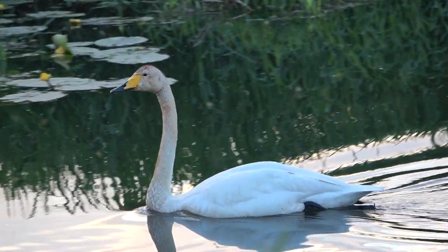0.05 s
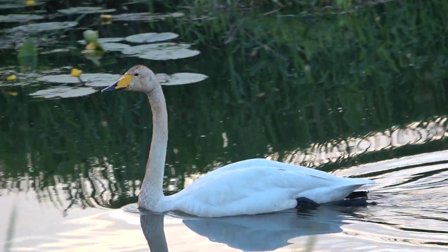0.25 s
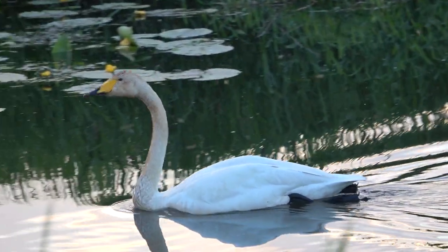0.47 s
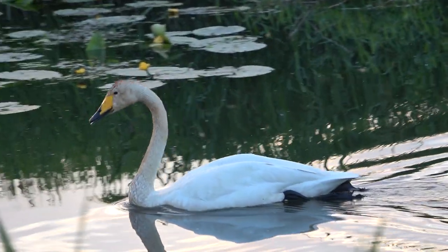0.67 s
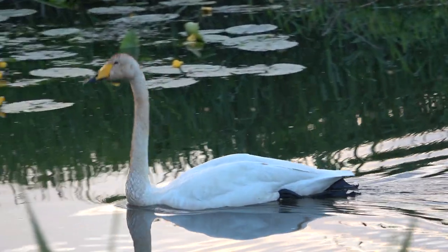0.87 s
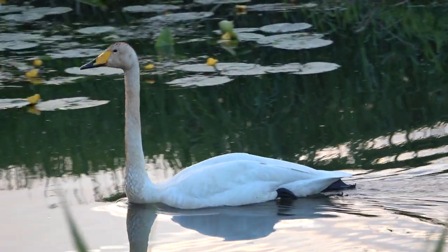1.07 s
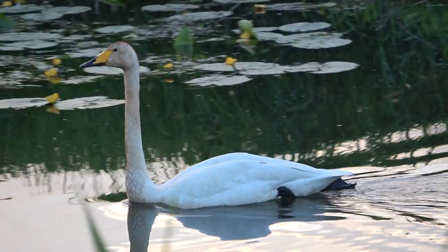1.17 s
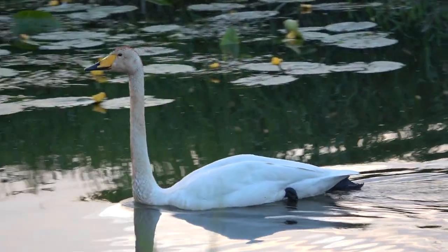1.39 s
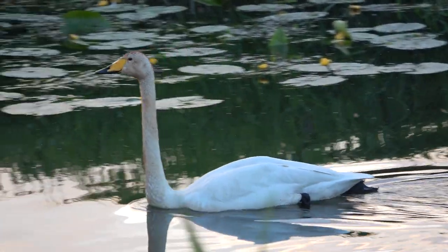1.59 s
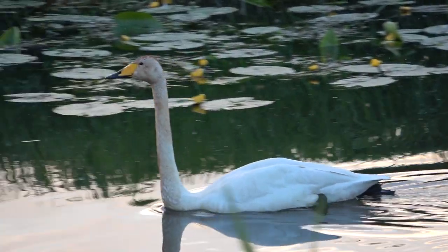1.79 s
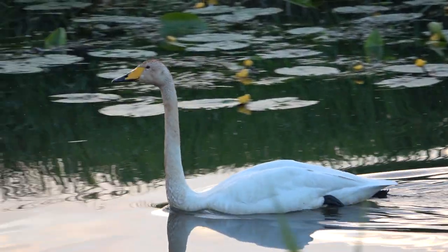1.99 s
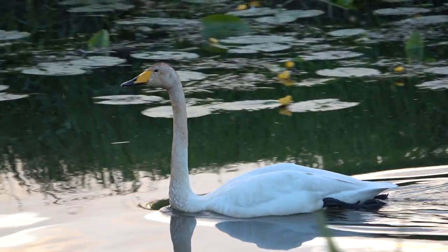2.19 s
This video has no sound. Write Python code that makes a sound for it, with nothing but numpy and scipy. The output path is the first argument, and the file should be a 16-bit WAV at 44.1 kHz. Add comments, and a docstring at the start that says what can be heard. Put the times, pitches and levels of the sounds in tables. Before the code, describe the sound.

A swan honks softly three times on a pond while small birds chirp and chatter nearby.

```python
"""A swan honks softly three times on a pond: stacks of overtones that brighten with effort.
Small birds sing in the reeds: a songbird's phrase and another bird's faint warble on the right, low piping,
chips, cheeps and faint far birds are bending whistles; a chatterer is a buzzy voice with a moving beak
resonance, one overtone doubled by a rising glide. Random taps scatter the calls. Shaped noise makes
the low rumble, a far drone (perhaps frogs), air hiss and dry rustling."""
import sys
import numpy as np
from scipy import signal
from scipy.fft import rfft, irfft
from scipy.io import wavfile
from scipy.ndimage import uniform_filter1d

SR = 44100
rng = np.random.default_rng(int(sys.argv[2]) if len(sys.argv) > 2 else 0)


def makeup_ratio(level_db):
    """Linear amplitude ratio for a level in decibels (20 dB per factor of ten)."""
    decades = np.asarray(level_db, float) / 20
    return 10 ** decades


def transcribe(signal):
    """Save signal, clipped to [-1, 1], as a 16-bit WAV file at the path in sys.argv[1]."""
    frames = np.atleast_2d(signal).T
    limited = np.clip(frames, -1, 1)
    pcm = np.round(limited * 32767).astype(np.int16)
    wavfile.write(sys.argv[1], SR, pcm)


N = 99225  # length in samples


def evened(x):
    """Scales a sound to an rms of 1."""
    return x / np.sqrt(np.mean(x ** 2) + 1e-20)


def read_curve(points, hz):
    """Reads a curve between its points, on a logarithmic pitch scale."""
    point_hz, value = np.transpose(points)
    return np.interp(np.log(hz + 1), np.log(point_hz + 1), value)


def add(mix, start_s, sound):
    """Adds a sound to the mix at its start time."""
    part = mix[max(round(start_s * SR), 0):][:len(sound)]
    part += sound[:len(part)]


def soft_edges(t, edge_s):
    """Fades a sound in and out so that it does not click."""
    from_edge = np.minimum(t - t[0], t[-1] - t)
    return np.sin(np.pi / 2 * np.clip(from_edge / edge_s, 0, 1)) ** 2


def wobble(n, window_s):
    """Random drift of rms about 1: noise averaged twice, slower for a longer window."""
    w = int(window_s * SR)
    noise = rng.standard_normal(N // 8)
    return uniform_filter1d(uniform_filter1d(noise, w), w)[:n] * np.sqrt(1.5 * w)


def place(x, lean_db):
    """Makes the left louder than the right by lean_db; below zero leans right."""
    return x * makeup_ratio([[lean_db / 2], [-lean_db / 2]])


def swan():
    """A long windpipe sounds many overtones at once; they grow faster than the pitch tone with effort."""
    # Three honks, each a path. Each row: time in seconds, level of the voice in dB, pitch in Hz.
    honks = [
        [(.776, -52.5, 579), (.795, -36.5, 603), (.812, -37.5, 549.7), (.842, -35.5, 549.4), (.851, -36, 595),
         (.866, -49, 714)],
        [(1.1, -50, 513), (1.113, -44, 554), (1.122, -44, 562), (1.138, -52.5, 568)],
        [(1.352, -52.5, 498), (1.367, -41, 534.6), (1.394, -45, 518), (1.405, -36, 542.4), (1.415, -38, 553),
         (1.421, -38.5, 600), (1.43, -94, 570)],
    ]
    # Overtones of the windpipe; half multiples come from strong-weak pulses.
    # Each row: multiple of the pitch, basic level in dB.
    windpipe = [(1, 0.5), (1.5, -22.5), (2, -14.5), (5, -10), (6, -16.5), (12, -35)]
    # One number per honk: basic change of its overtones in dB.
    honk_brass_db = [0, -16, -14]
    bright_at_db, brighten = -38, 1.3  # overtones gain 1.3 dB more per dB of level, around this level
    opens_s, grit_db = .038, 1.8  # overtones fade in over this time, and flicker this much

    out = np.zeros(N)
    for rows, brass_db in zip(honks, honk_brass_db):
        s, db, hz = np.transpose(rows)
        t = np.arange(s[0], s[-1], 1 / SR)
        level_db = np.interp(t, s, db)
        smooth_hz = uniform_filter1d(np.interp(t, s, hz), 100)
        turns = np.cumsum(smooth_hz * (1 + .003 * wobble(len(t), .003))) / SR
        effort_db = np.minimum(brighten * (level_db - bright_at_db), 3)
        opening_db = 20 * np.minimum((t - s[0]) / opens_s - 1, 0)
        overtone_db = brass_db + effort_db + opening_db
        tone = np.zeros(len(t))
        for multiple, basic_db in windpipe:
            extra_db = overtone_db + grit_db * wobble(len(t), 0.0016)
            extra_db = extra_db * min(multiple - 1, 1)  # none for the pitch tone, half at 1.5
            tone += makeup_ratio(basic_db + extra_db) * np.sin(2 * np.pi * multiple * turns)
        add(out, s[0], np.sqrt(2) * makeup_ratio(level_db) * soft_edges(t, 0.00098) * tone)
    return place(out, 1.36)


def whistler(notes, octave_db=-34, swell_db=-12, bend=2.3, top_at=.62):
    """Near-sine notes with an octave: each bends to its top pitch and away, swelling towards the top."""
    edge_s = .004  # also the window of the unsteadiness
    out = np.zeros(N)
    for start, length, db, first_hz, top_hz, last_hz in notes:
        t = np.arange(0, length, 1 / SR)
        u = t / length
        rising = u < top_at
        away = np.where(rising, 1 - u / top_at, (u - top_at) / (1 - top_at))  # 0 at the top, 1 at the ends
        hz = top_hz + (np.where(rising, first_hz, last_hz) - top_hz) * away ** bend
        angle = 2 * np.pi * np.cumsum(hz * (1 + .004 * wobble(len(t), edge_s))) / SR
        # Creeps in and stops short: the start is twice as many dB down as the end.
        level_db = db + swell_db * away ** 2 * np.where(rising, 2, 1)
        flutter_db = 3 * np.clip((-44 - db) / 10, 0, 1)  # faint notes flutter most
        level_db += flutter_db * wobble(len(t), edge_s)
        tone = np.sin(angle) + makeup_ratio(octave_db) * np.sin(2 * angle)
        add(out, start, np.sqrt(2) * makeup_ratio(level_db) * soft_edges(t, edge_s) * tone)
    return out


def right_whistles():
    """Whistled notes on the right: a phrase, its repeat, a faint high warble of another bird, and chips."""
    # The phrase, its repeat and the warble. Each row: start in seconds, length in seconds,
    # level at the top in dB, then first, top and last pitch in Hz.
    whistled = [(.31, 0.047, -42, 2600, 3230, 2480), (.322, 0.031, -53.5, 4000, 3770, 3680),
                (.399, 0.045, -34, 4135, 4263, 3600), (.42, 0.029, -54.5, 3100, 3380, 3300),
                (.452, 0.19, -62.5, 3900, 4560, 4220), (.598, 0.032, -53.5, 3690, 4210, 4150),
                (.638, 0.032, -51.5, 4560, 4380, 4370), (.641, 0.039, -44, 2480, 3344, 2280),
                (.72, 0.026, -50.5, 2990, 3570, 3500), (.872, 0.042, -58, 4170, 4820, 4660),
                (1.775, 0.027, -57.5, 3670, 3840, 3580), (1.838, 0.047, -42, 2590, 3163, 2600),
                (1.925, 0.051, -43, 3906, 4225, 3450), (1.955, 0.044, -50, 4200, 4350, 4100),
                (2.108, 0.028, -53.5, 3860, 4300, 4400)]
    # Pointed notes and quick chips. Each row: start in seconds, length in seconds, level at the top in dB,
    # then first, top and last pitch in Hz.
    chips = [(.203, .059, -43.5, 3330, 3740, 3210), (.382, 0.025, -54, 2110, 2880, 2050),
             (.408, 0.027, -61, 2470, 2880, 2300), (.935, 0.014, -48, 4180, 5000, 2900),
             (1.081, 0.029, -60, 2590, 3450, 3850), (1.515, 0.035, -55.5, 3050, 3600, 4130),
             (1.735, 0.051, -43.5, 3354, 3620, 3190), (2.086, 0.045, -60, 3050, 3600, 3580),
             (.993, 0.027, -53.5, 2800, 3480, 2680), (1.033, 0.029, -49, 2350, 3560, 2220),
             (1.909, 0.019, -52.5, 2050, 2810, 2200), (2.147, 0.016, -51, 2220, 3000, 3200),
             (2.162, 0.029, -54.5, 3160, 3480, 2500)]
    whistles = whistler(whistled, top_at=.8, bend=2.5, swell_db=-7)
    return place(whistles + whistler(chips, swell_db=-9, bend=1.5, top_at=.55), -6)


def low_whistles():
    """Low piped notes, and one rising glide that doubles an overtone of the chatterer."""
    # Near the middle: piped notes and the glide. Each row: start in seconds, length in seconds,
    # level at the top in dB, then first, top and last pitch in Hz.
    middle = [(.13, 0.059, -59.5, 1970, 2197, 1920), (.452, 0.066, -63.5, 2196, 2265, 2240),
              (.596, 0.045, -51, 2380, 2360, 2170), (1.085, 0.045, -60.5, 2174, 2600, 2900),
              (1.62, 0.11, -62.5, 2057, 2150, 1950), (2.0, 0.039, -57, 2340, 2175, 2020),
              (2.049, .018, -61, 2020, 2240, 2100), (2.098, 0.061, -57.5, 2290, 2440, 2170)]
    # Piped notes on the left. Each row: start in seconds, length in seconds, level at the top in dB,
    # then first, top and last pitch in Hz.
    left = [(2.065, 0.028, -61.5, 1990, 2017, 1940), (2.095, 0.026, -58, 2090, 1960, 1890),
            (2.122, 0.11, -61, 1930, 1888, 1860)]
    return place(whistler(middle, octave_db=-10, swell_db=-7), -1) + place(whistler(left, swell_db=-3), 10)


def chatterer():
    """Sliding overtones of a buzzy voice, picked out by a moving beak resonance and a fixed throat."""
    # Syllables, each a path. Each row: time in seconds, pitch in Hz, level of the voice in dB,
    # beak resonance in Hz.
    syllables = [
        [(.748, 1090, -53, 3530), (.772, 1270, -50, 3700), (.785, 1037, -55, 3700)],
        [(.795, 428, -58.5, 3230), (.82, 524, -54, 4460), (.84, 496, -54, 4340), (.855, 468, -60, 4400)],
        [(.963, 606, -72, 3030), (1.0, 754, -54, 4100)],
        [(1.095, 767, -69, 4100), (1.126, 887, -66, 4480)],
        [(1.127, 987, -57, 2980), (1.145, 1146, -57.5, 4300), (1.167, 1320, -54.5, 2600)],
        [(1.167, 1103, -50, 4550), (1.177, 1246, -48.5, 4750), (1.19, 1296, -46.5, 5020),
         (1.198, 1180, -58, 4800)],
        [(1.208, 1280, -74, 3030), (1.22, 1396, -51, 3480), (1.232, 1380, -86, 3840)],
        [(1.28, 609, -65.5, 4000), (1.305, 623, -52, 3900), (1.328, 483, -61, 3460)],
        [(1.328, 984, -50.5, 3400), (1.343, 1297, -55, 4370), (1.357, 1387, -49.5, 4370),
         (1.366, 1537, -43, 4560), (1.374, 1866, -54, 4270), (1.3805, 2600, -44.5, 5060),
         (1.387, 1820, -45.5, 4250)],
        [(1.386, 1350, -46, 5000), (1.396, 1664, -41, 4900), (1.406, 1420, -52, 4950)],
        [(1.455, 853, -66.5, 3940), (1.482, 915, -51, 4430), (1.499, 1054, -48, 4500),
         (1.512, 1314, -50.5, 5360), (1.527, 1720, -38.5, 5150), (1.536, 1530, -54, 4800)],
    ]
    trill_from_s, trill_to_s, trill_hz, trill_depth = 1.127, 1.158, 110, .05  # depth: share of pitch
    width = 0.17  # of both resonances, as a share of their pitch
    throat_hz, throat_db, ceiling_hz = 2600, -10, 6800

    out = np.zeros(N)
    k = np.arange(1, 16)[:, None]  # overtone numbers
    for rows in syllables:
        s, *paths = np.transpose(rows)
        t = np.arange(s[0], s[-1], 1 / SR)
        hz, db, beak_hz = (uniform_filter1d(np.interp(t, s, v), 150, mode="nearest") for v in paths)
        # One syllable warbles.
        trilling = (t > trill_from_s) * (t < trill_to_s)
        hz = hz * (1 + trill_depth * np.sin(2 * np.pi * trill_hz * (t - s[0])) * trilling)
        turns = np.cumsum(hz * (1 + 0.0098 * wobble(len(t), 0.0021))) / SR

        def resonance(centre_hz):
            """Lets through the overtones near a centre pitch."""
            return np.exp(-.5 * (np.log(k * hz / centre_hz) / width) ** 2)

        gain = resonance(beak_hz) + makeup_ratio(throat_db) * resonance(throat_hz)
        gain = gain / (1 + (k * hz / ceiling_hz) ** 8)
        # Each overtone drifts in level and carries some noise.
        rasp = np.array([makeup_ratio(2 * wobble(len(t), .006)) + .18 * wobble(len(t), .0006) for _ in k])
        overtones = np.sin(2 * np.pi * (k * turns + rng.random(k.shape)))
        tone = (gain * rasp * overtones).sum(0)
        add(out, s[0], np.sqrt(2) * makeup_ratio(db) * soft_edges(t, 0.0011) * tone)
    return place(out, -8)


def cheeps():
    """Thin high whistles, somewhat to the right."""
    # Cheeps. Each row: start in seconds, length in seconds, level at the top in dB,
    # then first, top and last pitch in Hz.
    notes = [(.22, 0.025, -62.5, 4060, 6040, 6100), (.336, .014, -58.5, 4220, 6070, 6450),
             (.579, 0.013, -64.5, 6620, 6800, 6860), (.883, 0.0085, -60, 6800, 7000, 7160),
             (.919, 0.012, -63, 6800, 7150, 7300), (1.65, 0.06, -60.5, 6000, 5510, 4700),
             (1.745, 0.02, -59.5, 6430, 5940, 5000)]
    return place(whistler(notes, swell_db=-2, bend=1.2), -4)


def far_birds():
    """A faint random scatter of short glides: half well to the right, half nearer the middle."""
    per_s, low_hz, high_hz = 90, 2300, 5600  # notes per second, range of the top pitch
    r = rng.random((250, 6))
    start = np.cumsum(-np.log(r[:, 0] + 1e-9)) / per_s
    length = .01 + .03 * r[:, 2]
    level_db = -78 + 8 * r[:, 3] ** 2
    top = low_hz * (high_hz / low_hz) ** r[:, 1]
    first, last = top * (.7 + .35 * r[:, 4]), top * (.8 + .25 * r[:, 5])
    notes = np.c_[start, length, level_db, first, top, last][start < N / SR]
    return place(whistler(notes[::2], bend=1.35), -13.5) + place(whistler(notes[1::2], bend=1.42), -1.2)


def reeds(x):
    """Scatter from banks and reeds: a decaying tail of random taps, alike in both ears, stronger right."""
    t60_s, delay_s = 0.33, 0.0041  # time to die away by 60 dB, wait before the first taps
    t = np.arange(SR // 2) / SR
    taps = rng.standard_normal((2, len(t))) * (rng.random((2, len(t))) < .05)
    tail = taps * makeup_ratio(-60 * t / t60_s) * (t > delay_s)
    tail[1] = 1.67 * tail[0] + 0.23 * tail[1]
    return makeup_ratio(-15.5) * signal.fftconvolve(x, tail / np.linalg.norm(tail[0]), axes=1)[:, :N]


def rustles():
    """Short puffs of crackly noise, an octave or so wide, a little to the right."""
    # Puffs. Each row: time of the peak in seconds, level at the peak in dB, length in seconds,
    # centre of the noise in Hz.
    puffs = [(.01, -59.5, 0.027, 4400), (0.08, -59, 0.01, 5150), (1.55, -57, 0.045, 4540),
             (1.61, -59.5, 0.025, 7700), (1.746, -65, 0.029, 8100), (1.815, -62, 0.022, 10200),
             (1.77, -63.5, 0.32, 7200)]
    out = np.zeros((2, N))
    t = np.arange(N) / SR
    f = np.fft.rfftfreq(N, 1 / SR)
    for peak_s, db, length, hz in puffs:
        crackle_db = 4 * rng.standard_normal(N // 64 + 1).repeat(64)[:N]  # jumps every 64 samples
        grit = rng.standard_normal((2, N)) * makeup_ratio(crackle_db)
        grit[1] = .8 * grit[0] + .6 * grit[1]  # the ears hear partly the same
        band = np.exp(-.5 * (np.log((f + 1) / hz) / 0.23) ** 2)
        puff = evened(irfft(rfft(grit) * band, N))
        out += makeup_ratio(db) * puff * np.exp(-.5 * ((t - peak_s) / (length / 2)) ** 2)
    return place(out, -3)


def air():
    """Rumble, far drone bands and hiss: random short-time spectra with drifting patches."""
    # Colour of the noise. Each row: frequency in Hz, relative level per Hz in dB.
    colour = [(15, -50), (25, 2.5), (75, 2), (110, -3.5), (169, -9), (331, -12.5), (445, -5.5), (567, -2.5),
              (921, -12.5), (1140, -13.5), (1270, -4.5), (1500, -18.5), (2120, -16.5), (4400, -16),
              (7520, -22), (12500, -28.5), (15600, -30.5)]
    # How alike the two ears are. Each row: frequency in Hz, likeness (1 is the same).
    likeness = [(80, 1), (150, 0.54), (300, 0.73), (1200, 0.84), (2500, 0.95), (5000, 0.94), (8000, 0.051),
                (13000, 0.67)]
    # Balance. Each row: frequency in Hz, left minus right in dB.
    balance = [(60, -0.5), (250, 2), (1200, 5), (2500, -1.5), (12000, 0)]
    frames, hz = N // 512 + 5, np.fft.rfftfreq(2048, 1 / SR)
    a, b, c, d, patches = rng.standard_normal((frames, 1025, 5)).T
    patches = evened(uniform_filter1d(uniform_filter1d(patches, 20, 0), 4, 1))
    same = np.clip(read_curve(likeness, hz), -1, 1)[:, None]
    left = a + 1j * b
    right = same * left + np.sqrt(1 - same ** 2) * (c + 1j * d)
    lean_db = read_curve(balance, hz)[:, None] / 2
    patch_db = 1.6 * patches * (hz < 8000)[:, None]
    level_db = read_curve(colour, hz)[:, None] + patch_db + np.array([lean_db, -lean_db])
    spectra = np.array([left, right]) * makeup_ratio(level_db)
    noise = signal.istft(spectra, nperseg=2048, noverlap=1536)[1][:, :N]
    return makeup_ratio(-55) * evened(noise)  # overall rms of -55 dB


def scene():
    """The swan and the small birds, their scatter, the rustles and the air."""
    big = swan()
    small = right_whistles() + low_whistles() + chatterer() + cheeps() + far_birds()
    scatter = reeds(small + makeup_ratio(-8) * big)  # the swan scatters less
    return big + small + scatter + rustles() + air()


def roll_off(x):
    """The treble ends steeply here."""
    return signal.sosfilt(signal.butter(12, 15700, fs=SR, output="sos"), x)


def record(dry):
    """Turns the finished mix into the sound that is written."""
    return roll_off(dry)


dry = scene()
out = record(dry)
transcribe(out)
```